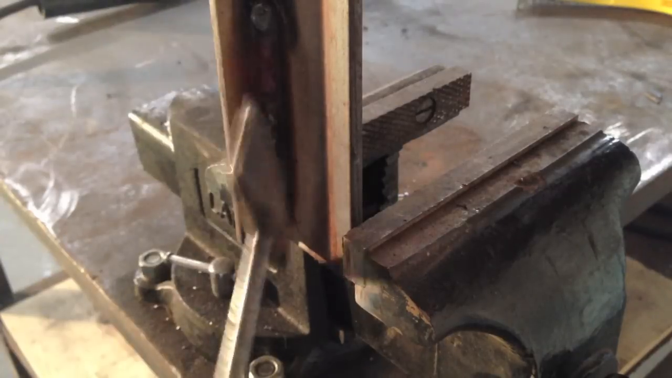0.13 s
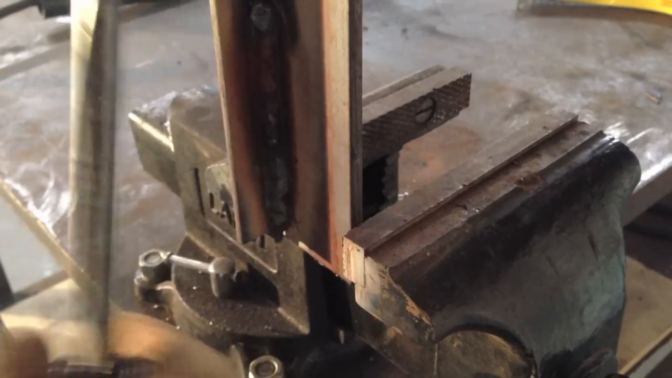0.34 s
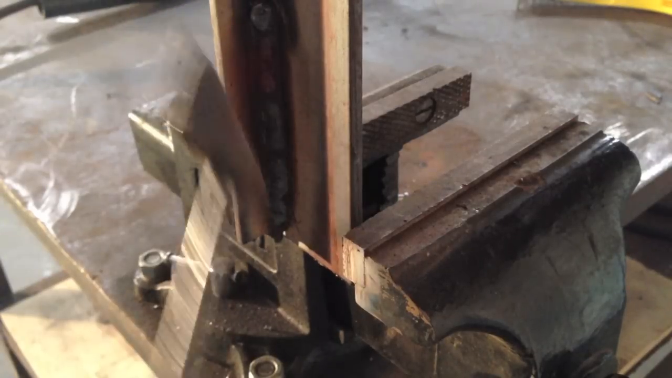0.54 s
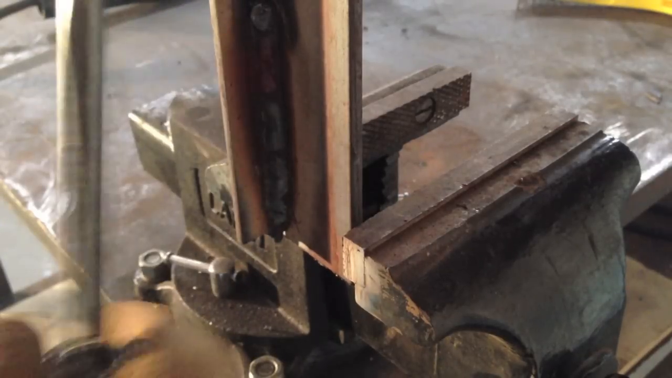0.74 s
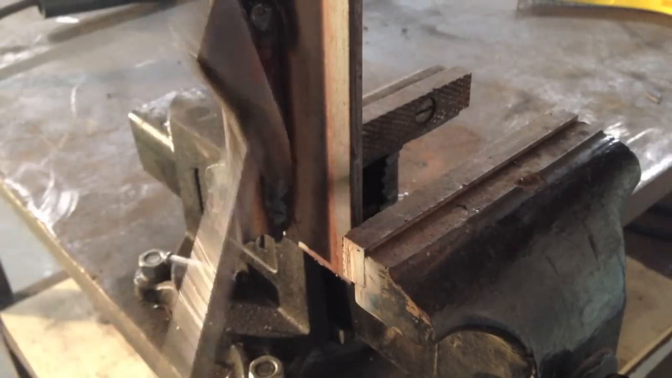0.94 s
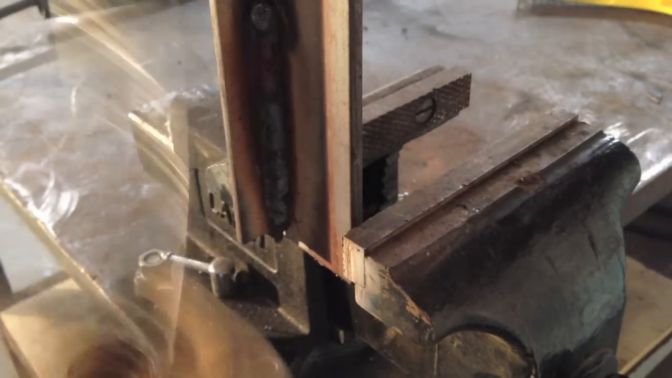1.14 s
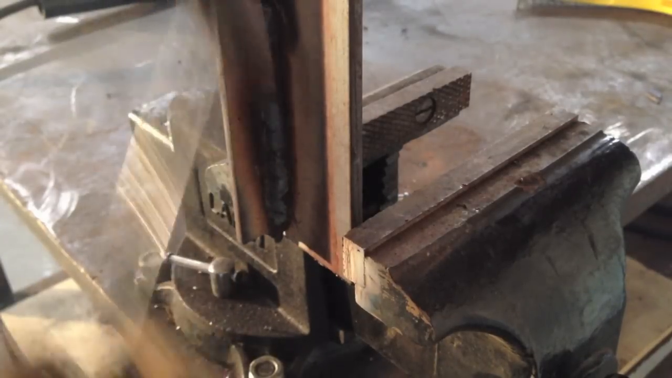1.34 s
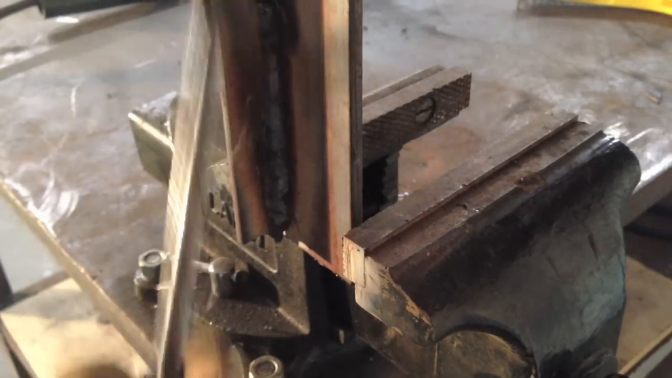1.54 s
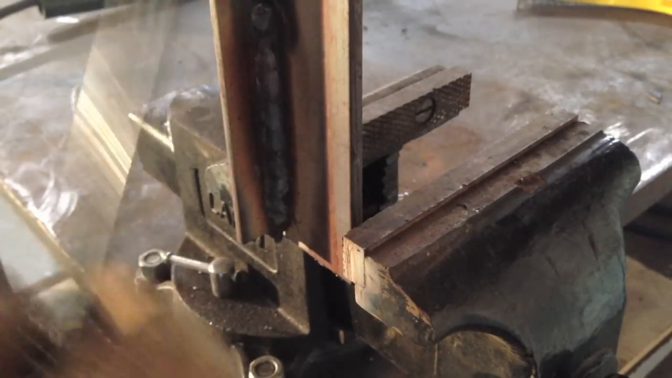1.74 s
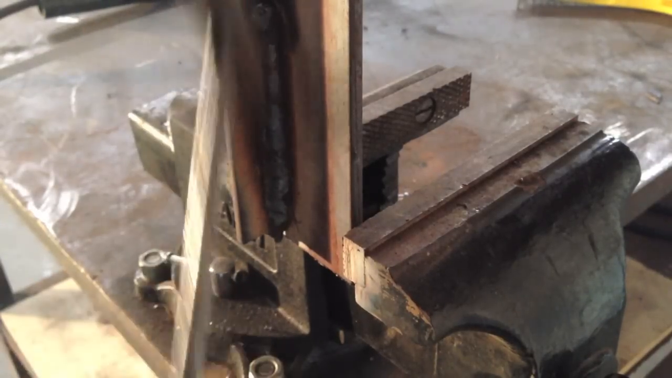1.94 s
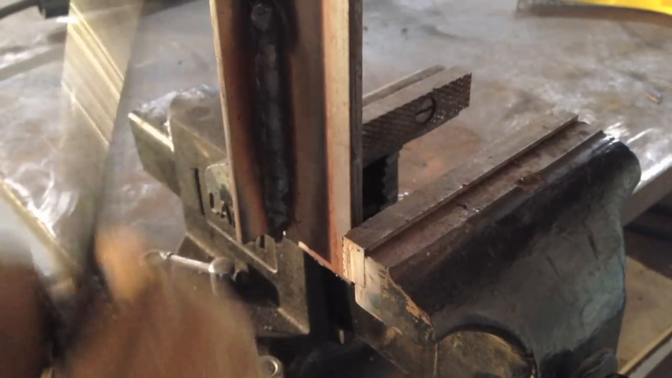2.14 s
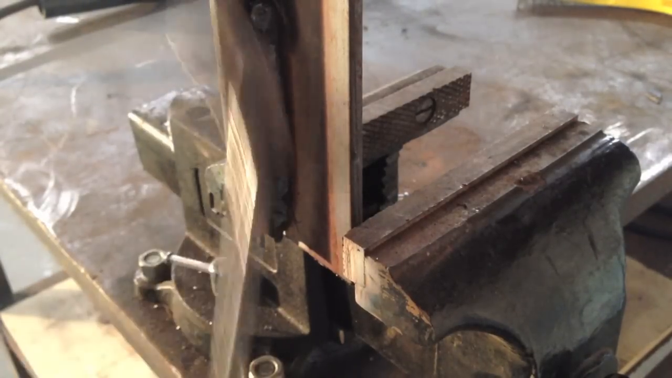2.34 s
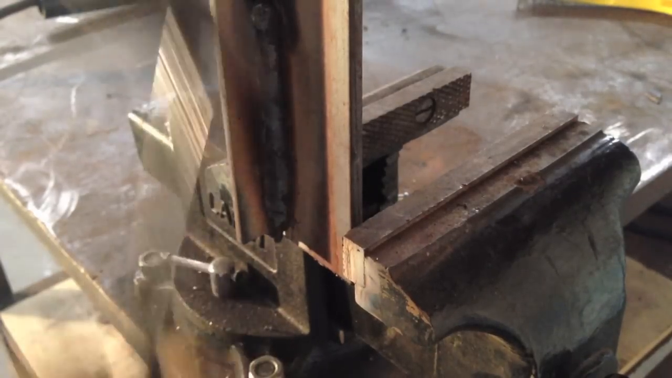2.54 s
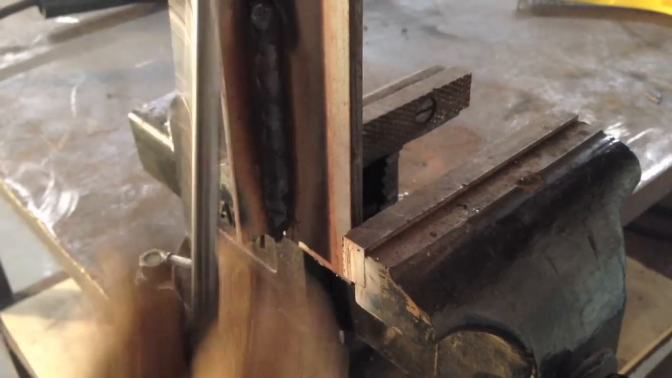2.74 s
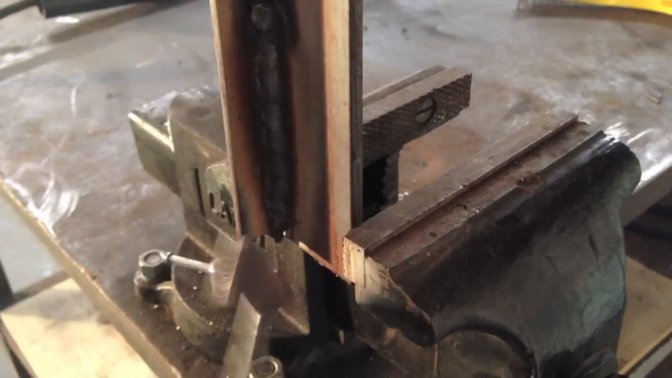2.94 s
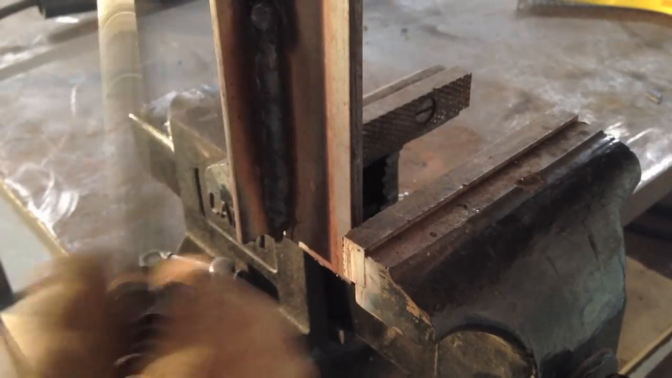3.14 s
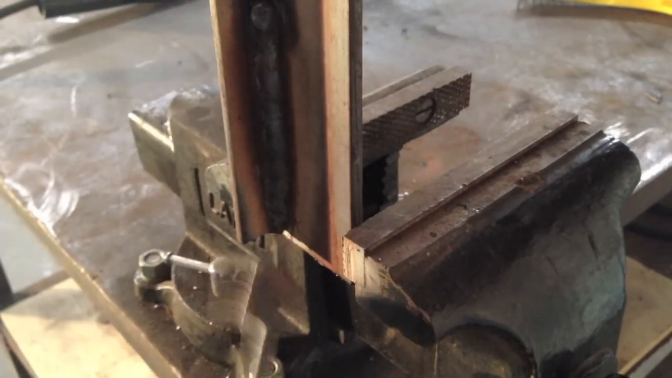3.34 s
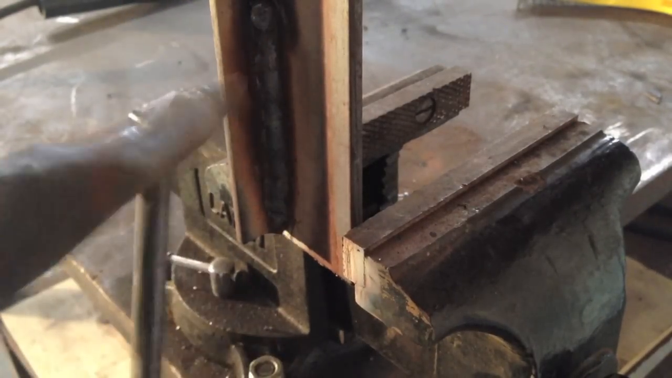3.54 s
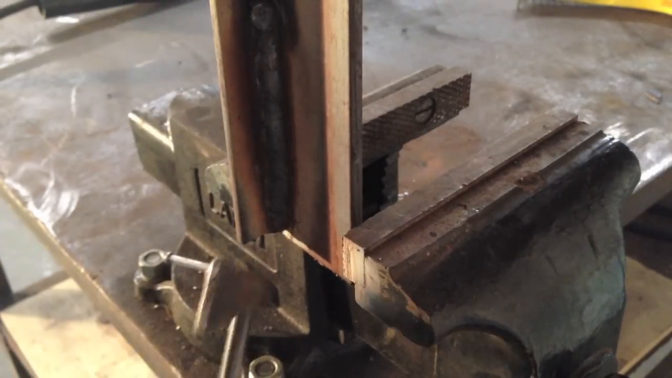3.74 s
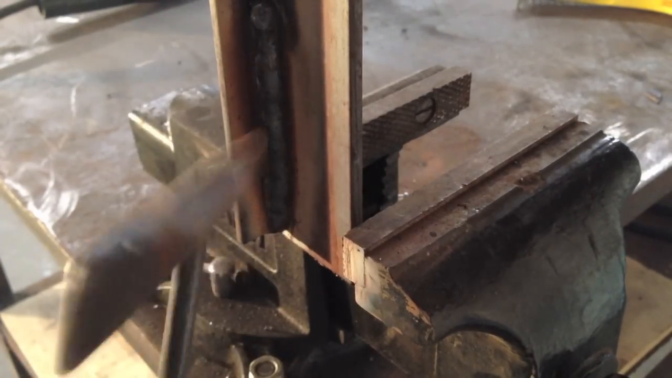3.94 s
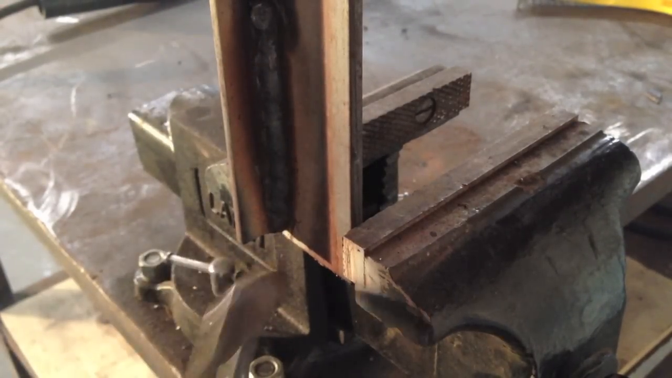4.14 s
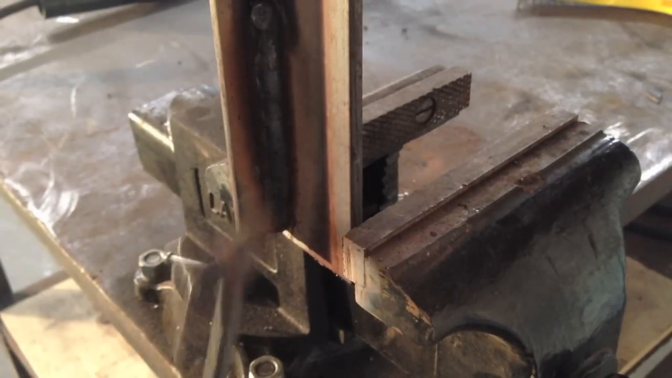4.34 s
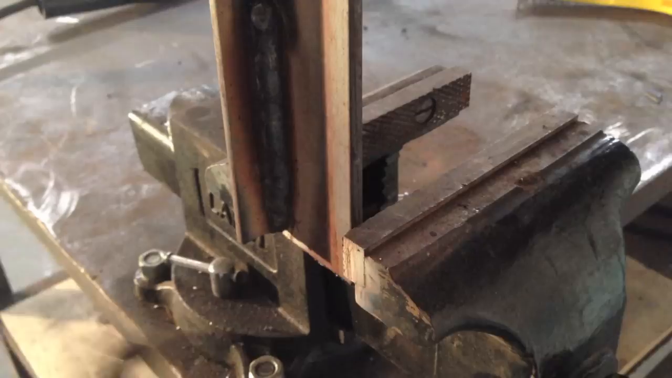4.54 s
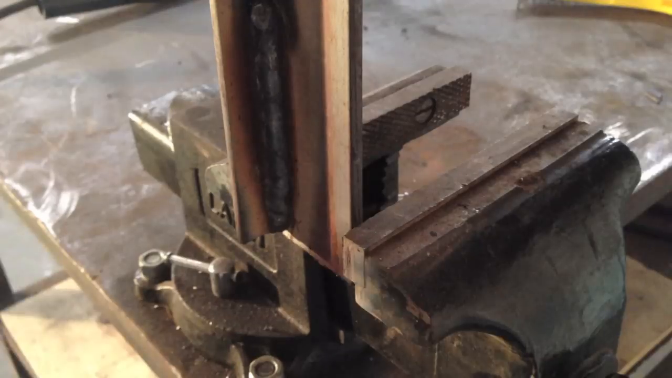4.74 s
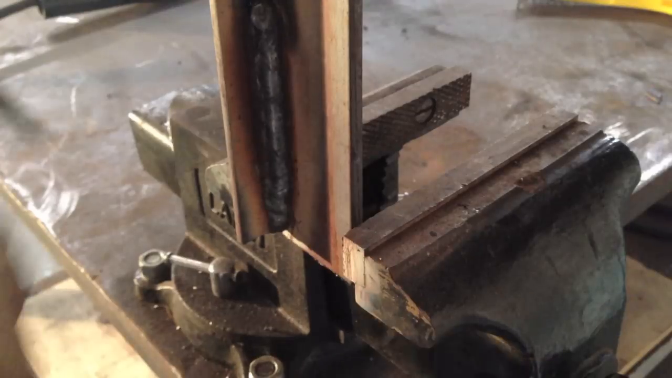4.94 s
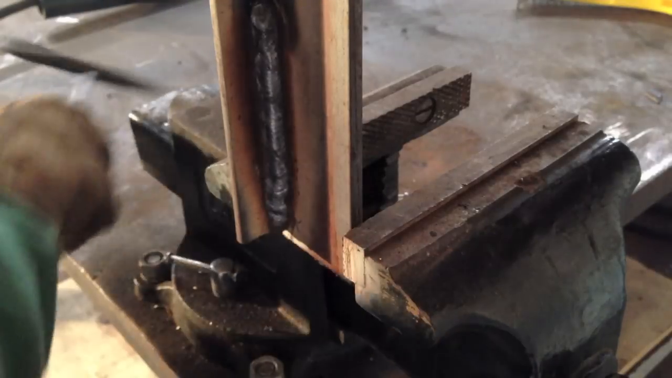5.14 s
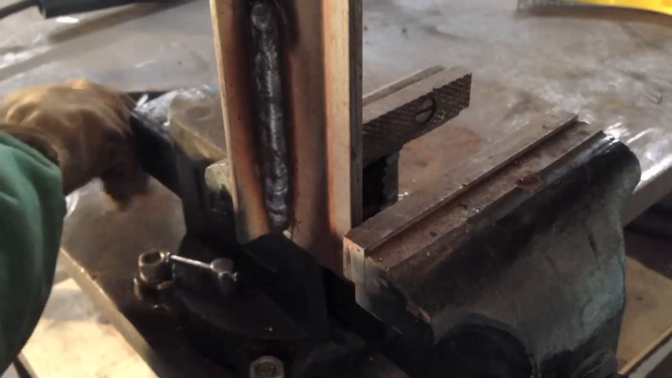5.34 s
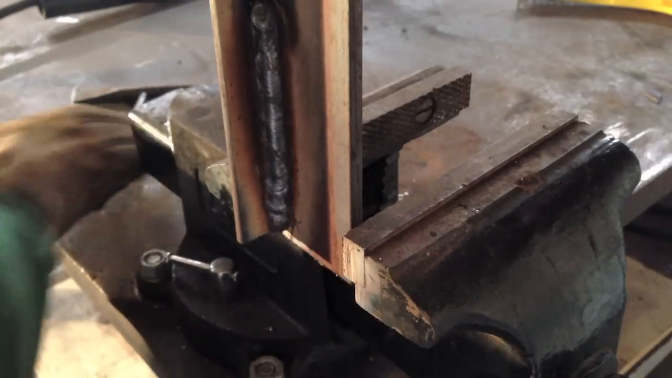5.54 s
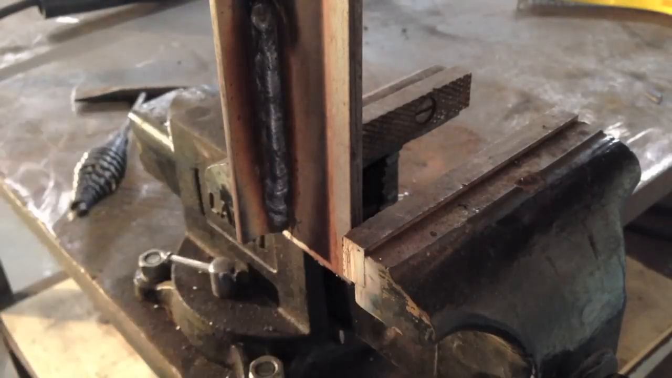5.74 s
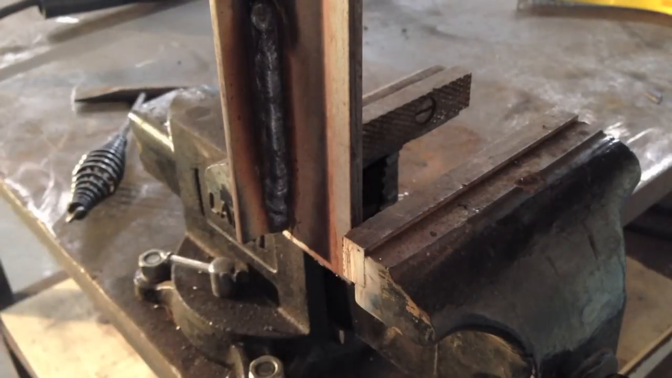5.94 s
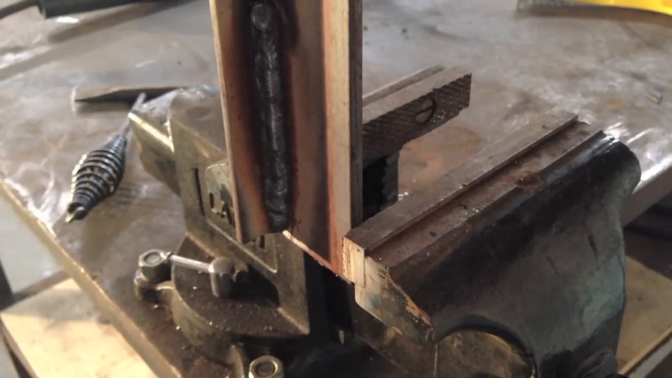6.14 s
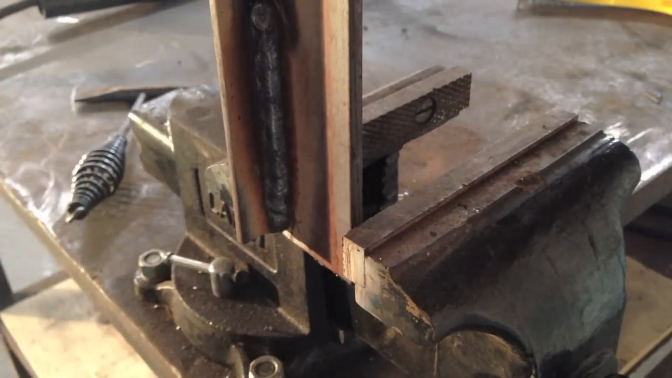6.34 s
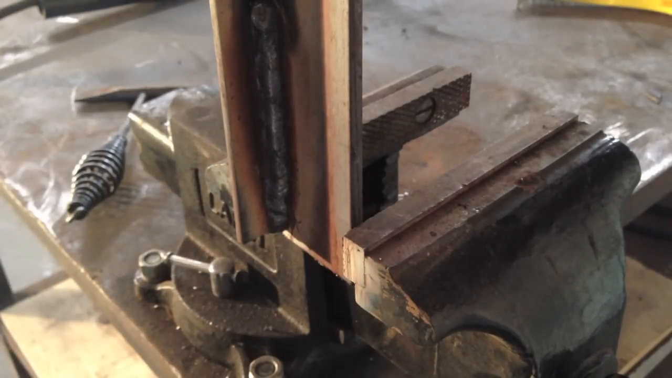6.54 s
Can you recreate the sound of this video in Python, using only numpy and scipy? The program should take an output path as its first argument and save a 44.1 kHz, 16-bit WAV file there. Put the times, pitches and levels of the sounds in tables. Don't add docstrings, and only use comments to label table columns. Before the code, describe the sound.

A close microphone in a workshop picks up a steel hammer chipping weld slag from plates clamped in a vise. From 0.1 seconds, sharp bright cracks fall about every 0.37 seconds, each with brittle sizzle, a midrange plate ring and a small vise rattle; some add a very high, quickly damped hammer ping. Around 2.3 seconds the edge skips and scrapes grittily; further scraping strokes come at 2.8 and 3.25, with tight double and triple clicks. Firm ringing knocks follow at 3.7, 4.1 and 4.4, then the metal dies away. At 5.3 seconds the hammer is dropped on a steel bench: a hard double clack with a hollow boom, then lighter jingling bounces from 5.5 to 5.7, a soft rocking rumble, and a short slide stopping near 6.1. Only quiet ventilation hum and hiss remain until about 6.6 seconds.

```python
import sys
import numpy as np
from scipy import signal
from scipy.io import wavfile
from scipy.ndimage import uniform_filter1d

SR = 44100
rng = np.random.default_rng(int(sys.argv[2]) if len(sys.argv) > 2 else 0)


def volts_from_db(level):
    exponent = np.asarray(level, float) / 20
    return 10 ** exponent


def generate_wav(sig):
    pcm = np.round(np.clip(np.atleast_2d(sig).T, -1, 1) * 32767).astype(np.int16)
    wavfile.write(sys.argv[1], SR, pcm)


N = 291058

# t/s, crack peak level/dB, plate level/dB, head ring
# level/dB, free fin level/dB
BLOWS = [(0.0978, -2, -27.5, -8, -33.5), (0.4847, 2.5, -27, -29, -32.5), (0.854, 4, -21, -7, -45),
         (1.2275, 0, -23.5, -47.5, -52), (1.5921, 0, -20, -17, -19.5), (1.951, -3.5, -26, -47, -25.5),
         (2.3175, -2, -25, -28, -19.5), (2.7666, -11, -23, -55.5, -28.5), (2.8425, -6.5, -19.5, -28, -24.5),
         (3.246, -9, -40, -17, -22), (3.3813, -25, -20.5, -25, -21.5), (3.7124, -1, -22, -35.5, -24),
         (4.0782, 1, -18.5, -43, -22), (4.405, -1, -18.5, -47, -17)]
# t/s, crack peak level/dB, plate level/dB, head ring level/dB
SKIPS = [(0.4787, -3.5, -25.5, -34.5), (0.8586, 4, -30.5, -22.5), (0.9125, -25, -43, -52),
         (1.1052, -33.5, -54, -47), (1.2438, -18, -27, -22.5), (1.9903, -8, -27.5, -64),
         (2.2382, -28, -55, -60), (2.3272, -6, -22, -30), (2.3405, -33, -22, -14.5),
         (2.4394, -18, -25, -28.5), (2.791, -8, -25, -60), (2.817, -1, -18, -60), (3.2553, -30.5, -18, -38),
         (3.269, -4.5, -28, -49), (3.296, -25, -26, -29), (3.3025, -6.5, -36, -11),
         (3.32, -19, -17.5, -12.5), (3.706, -2.5, -29, -19), (3.7588, -13, -25.5, -51),
         (3.7774, -11, -39, -48), (4.1304, -23, -36, -33), (4.4273, -9.5, -31, -20.5)]
# start t/s, length t/s, grit level/dB, push level/dB, push swell level/dB
DRAGS = [
    (2.25, 0.038, -58, -52, 0),
    (2.319, 0.11, -31.5, -23.5, -0.5),
    (2.808, 0.12, -31, -31, 3),
    (3.249, 0.11, -25.5, -26, 5.5),
    (5.576, 0.35, -52, -38, -9),
    (5.887, 0.21, -47.5, -51.5, -1),
]
# t/s, crack peak level/dB, bench level/dB, jingle level/dB
DROPS = [
    (5.326, -1.5, -11.5, -53),
    (5.3388, 0, -17, -30),
    (5.358, -10, -30, -37),
    (5.4902, -16, -25.5, -30),
    (5.5819, -11, -29.5, -30),
    (5.658, -11.5, -32, -29),
    (5.7828, -29, -37, -33.5),
    (5.8399, -9.5, -38.5, -29),
    (5.8788, -16.5, -31.5, -30.5),
    (5.9365, -24, -34.5, -35),
]
# t/s, high ring level/dB, low ring level/dB
LIFTS = [(.075, -51.5, -65.5), (.086, -53, -72), (.106, -28.5, -47), (1.246, -44, -58), (2.842, -25, -33),
         (2.875, -30, -53), (3.29, -45, -30), (3.382, -20.5, -29), (3.759, -31, -39), (4.133, -40.5, -69)]
# f/Hz, t60/s, beat f/Hz
SONG = [(7995, 0.077, 49), (3800, .13, 12)]
# t/s, f/Hz, level/dB
ACCENTS = [(.098, 905, -38.5), (.485, 900, -35), (.487, 2603, -40.5), (.486, 6410, -29.5),
           (.856, 950, -32.5), (.855, 1530, -40.5), (.855, 2010, -49), (.856, 2604, -29), (.856, 6500, -42),
           (1.228, 925, -30), (1.227, 910, -34), (1.24, 285, -34.5), (1.227, 5900, -46),
           (1.592, 940, -31.5), (1.592, 260, -34), (2.326, 1497, -26.5), (2.34, 1896, -38),
           (2.341, 1400, -35), (2.819, 1070, -45), (2.79, 1490, -31), (3.27, 1495, -31),
           (3.253, 990, -31.5), (3.711, 1840, -27.5), (3.712, 1526, -37.5), (4.08, 1873, -25.5),
           (4.078, 2903, -36), (4.077, 1600, -34), (4.405, 1700, -30), (4.425, 380, -34.5)]
# f/Hz, level/dB against the plates
EVERY_BLOW = [(1515, -13), (1893, -12), (2196, -18), (2603, -24)]
# f/Hz, t60/s
ACCENT_DECAY = [(300, .35), (930, 0.42), (1500, .55), (1850, 0.35), (2600, 0.28), (6000, .15)]
# f/Hz, level/dB, t60/s
HEAD_MODES = [(3730, -25, .2), (6400, -32.5, .05), (7370, -15, 0.11), (7990, -4.5, 0.21), (8514, -1, 0.04)]
# f/Hz, level/dB, t60/s
PLATE_MODES = [(290, -6, .2), (395, -5, .15), (620, -11, .15), (765, -16, .15), (921, 0, .2),
               (953, -4, .18), (980, -3, .18), (1035, -4, .18), (1165, -8, .18), (1455, -7, .15),
               (1495, -1, .17), (1545, -4, .17), (1668, -7, .17), (1872, -3, .15), (1930, -7, .15),
               (2025, -6, .15), (2100, -9, .15), (2200, -8, .15), (2600, -9, .15)]
# f/Hz, level/dB, t60/s
BENCH_MODES = [(217, -2, 0.092), (279, -1.5, 0.23), (418, -2, 0.22), (512, -15, 0.16), (661, -1, 0.13),
               (1012, -6.5, .18), (1076, -3, 0.14), (1300, 1, 0.085), (1454, -4, 0.13), (1894, -8.5, 0.079)]
# f/Hz, level/dB, t60/s
LOOSE_MODES = [(1405, -2, .15), (1660, -1, .2), (1900, -3, .15), (2400, -6, .15), (2730, -6, .15),
               (3180, -8, .1), (3520, -2, .09), (3850, -7, .1), (4090, -7, .1), (4495, -8, .07),
               (4870, -8, .1), (5370, -10, .07), (5860, -8, .1), (6300, -8, .1), (6770, -5, .1),
               (7560, -6, .1), (7750, -5, .1), (7960, -4, .12), (8440, -6, .08), (8700, -9, .08)]
# f/Hz, level/dB per Hz
CRACK = [(880, -32.5), (1500, -18.5), (3580, -5), (4230, -12.5), (6310, -5.5), (7380, -10.5), (8210, 18.5),
         (12300, -46), (15500, -44.5)]
# f/Hz, level/dB per Hz
SIZZLE = [(1180, -34.5), (2000, -0.5), (2170, -24.5), (2620, -19.5), (4820, -9), (8050, -4.5), (9320, -2),
          (11200, -51.5), (14000, -46)]
# f/Hz, level/dB per Hz
RATTLE = [(47, -62.5), (80, -23.5), (160, -14.5), (298, -3.5), (772, -12), (1210, -3), (1320, -8.5),
          (1860, -9.5), (2300, -13.5), (5000, -23), (6500, -48), (11000, -120)]
# f/Hz, level/dB per Hz
BOOM = [(35, -62), (60, 11.5), (199, -20.5), (295, -12), (418, 3), (786, -10), (896, -5), (1330, 1),
        (2440, -9), (7930, -12.5), (11000, 0), (14300, -61), (22000, -120)]
# f/Hz, t60/s
DYING = [(100, 0.27), (300, 0.65), (1000, 0.57), (2500, 0.59), (5000, 0.3), (8000, 0.31), (14000, .2)]
# f/Hz, level/dB per Hz
SHOP = [(15, -76), (25, -55), (92, -21.5), (108, -17.5), (195, -1), (309, -16.5), (344, -4), (427, -6),
        (863, -31), (988, 0), (1160, -22), (1520, -20), (2350, -36), (14800, -45), (16000, -62)]
# t/s, level/dB
SHOP_LEVEL = [(0, -41), (.09, -50), (.8, -50), (2, -47), (6.6, -46)]

FIN_HZ, FIN_T60_S = 1227, .66
BEAT_SHARE = .008
FREE_S, SKIP_FIN_DB = 0.0068, -16
BITE_DB_PER_S, LET_GO_DB_PER_S, GRIT_THINS_DB_PER_S = 2500, 500, 2.5
BENCH_S, SLIDE_S = 5, 5.86


def contacts():
    skips = [(s, crack_db, plate_db, ring_db, plate_db + SKIP_FIN_DB) for s, crack_db, plate_db, ring_db in SKIPS]
    return np.insert(np.transpose(BLOWS + skips), obj=4, values=FREE_S, axis=0)


def cracks(times, crack_db):
    power = clicks(times, volts_from_db(2 * crack_db))
    between_bounces = (np.arange(N) > BENCH_S * SR) & (np.arange(N) < SLIDE_S * SR)
    grains = (drag("grit") * ~between_bounces * grit(per_s=490.0, spread_db=9.5)) ** 2
    snap = volts_from_db(-12.5) * np.sqrt(fading(power, 0.039) + volts_from_db(-19.5) * fading(grains, 0.048))
    bright = sum(noise for hz, noise in bands(CRACK))
    sizzle = tail(power + volts_from_db(-48) * grains, SIZZLE, longer=0.84, rise_cycles=6.9)
    return snap * bright + volts_from_db(-32) * sizzle


def ticks(times, crack_db):
    white = rng.standard_normal(N)
    power = clicks(times, volts_from_db(2 * crack_db))
    burst = np.sqrt(fading(power, 0.015)) * white
    fizz = burst + volts_from_db(-11) * drag("grit") * white
    splash = np.sqrt(fading(power, 0.14)) * white
    top = bandpass(2, 9000, 11500, burst) + volts_from_db(-13.5) * bandpass(3, 9300, 10900, splash)
    air = bandpass(3, 13000, 15500, fizz)
    return volts_from_db(-27.5) * top + volts_from_db(-37.0) * air


def head(times, ring_db, free_s):
    t, out = np.arange(SR // 2) / SR, np.zeros(N + SR)
    share_db = 1.0 * rng.standard_normal((len(times), len(HEAD_MODES)))
    for s, db, free, shares in zip(times, ring_db, free_s, share_db):
        damped = volts_from_db(-20.5) + (1 - volts_from_db(-17.0)) * np.exp(-np.clip(t - free, 0, None) / 0.0011)
        tone = sum(volts_from_db(mode_db + share - 60 * t / t60) * np.sin(2 * np.pi * hz * t)
                   for (hz, mode_db, t60), share in zip(HEAD_MODES, shares))
        start = int(s * SR)
        out[start:start + len(t)] += volts_from_db(db + 3.0) * damped * tone
    return out[:N]


def drag(kind):
    t, out_db = np.arange(N) / SR, -150
    for s, length, grit_db, push_db, swell_db in DRAGS:
        held = np.clip(t - s, 0, length)
        if kind == "grit":
            db = grit_db - GRIT_THINS_DB_PER_S * held
        else:
            db = push_db + swell_db * held / length
        db = db - BITE_DB_PER_S * np.clip(s - t, 0, 1)
        db = db - LET_GO_DB_PER_S * np.clip(t - s - length, 0, 1)
        out_db = np.maximum(out_db, db)
    return volts_from_db(out_db)


def grit(per_s, spread_db):
    sizes = volts_from_db(spread_db * np.minimum(rng.exponential(1, N), 3)) * rng.choice([-1, 1], N)
    return rms_one(sizes * (rng.random(N) < per_s / SR))


def plates():
    s, _, plate_db, _, _, fin_db = contacts()
    push = drag("push") * (np.arange(N) < BENCH_S * SR)
    rub = volts_from_db(-36.5) * push * grit(per_s=820.0, spread_db=1.5)
    modes = struck(PLATE_MODES, s, plate_db - 17.5, rub, spread_db=3.0, chatter_db=-26.0, chatter_t60=0.43)
    power = clicks(s, volts_from_db(2 * fin_db))
    swell = np.sqrt(fading(power, FIN_T60_S)) - np.sqrt(fading(power, 0.28))
    fin = swell * np.sin(2 * np.pi * FIN_HZ * np.arange(N) / SR)
    shaken = clicks(s, volts_from_db(2 * plate_db)) + volts_from_db(-77) * push ** 2
    rattle = tail(shaken, RATTLE, longer=0.82, rise_cycles=2.0)
    return modes + accents(), fin + volts_from_db(-6.5) * rattle


def accents():
    t, out = np.arange(SR // 2) / SR, np.zeros(N + SR)
    usual = [(row[0], hz, row[2] + db + 2.5 * rng.standard_normal()) for row in BLOWS for hz, db in EVERY_BLOW]
    rows = [(s, hz, db, at_hz(ACCENT_DECAY, hz), BEAT_SHARE * hz) for s, hz, db in ACCENTS + usual]
    rows += [(s, hz, db, t60, beat_hz) for s, *levels in LIFTS for db, (hz, t60, beat_hz) in zip(levels, SONG)]
    for s, hz, db, t60, beat_hz in rows:
        cluster = sum(height * np.sin(2 * np.pi * (hz + k * beat_hz) * t)
                      for height, k in [(0.91, 0), (0.81, 0.92), (-0.47, -1.4)])
        start = int(s * SR)
        out[start:start + len(t)] += volts_from_db(db - 60 * t / t60) * cluster
    return out[:N]


def bench():
    s, _, bench_db, jingle_db = np.transpose(DROPS)
    push = drag("push") * (np.arange(N) > BENCH_S * SR)
    grains = grit(per_s=400.0, spread_db=0.5)
    rub = volts_from_db(-34.0) * push * grains
    modes = struck(BENCH_MODES, s, bench_db - 16.5, rub, spread_db=4.5, chatter_db=-23.5, chatter_t60=0.46)
    slide = volts_from_db(-35) * drag("grit") * (np.arange(N) > SLIDE_S * SR) * grains
    jingle = struck(LOOSE_MODES, s, jingle_db - 12, slide, spread_db=3.5, chatter_db=-21.5, chatter_t60=0.074)
    shaken = clicks(s, volts_from_db(2 * bench_db)) + volts_from_db(-64) * push ** 2
    boom = tail(shaken, BOOM, longer=1.0, rise_cycles=2.9)
    rumble = ring(push * rng.standard_normal(N), 370, 0.029)
    return modes + jingle, volts_from_db(-4) * boom + volts_from_db(-11.5) * rumble


def shop():
    level_db = np.interp(np.arange(N) / SR, *np.transpose(SHOP_LEVEL))
    return volts_from_db(level_db) * sum(noise for hz, noise in bands(SHOP))


def struck(modes, times, db, rub, spread_db, chatter_db, chatter_t60):
    share_db = spread_db * rng.standard_normal((len(times), len(modes)))
    chatter = np.sqrt(fading(clicks(times, volts_from_db(2 * (db + chatter_db))), chatter_t60))
    feed = rub + chatter * rng.standard_normal(N)
    return sum(volts_from_db(mode_db) * ring(clicks(times, volts_from_db(db + share_db[:, k])) + feed, hz, t60)
               for k, (hz, mode_db, t60) in enumerate(modes))


def ring(force, hz, t60):
    r, w = volts_from_db(-60 / (t60 * SR)), 2 * np.pi * hz / SR
    return signal.lfilter([0, np.sin(w)], [1, -2 * r * np.cos(w), r * r], force)


def tail(power, spectrum, longer, rise_cycles):
    out = np.zeros(N)
    for hz, noise in bands(spectrum):
        r = np.exp(-hz / (rise_cycles * SR))
        dying = fading(power, longer * at_hz(DYING, hz))
        out += noise * np.sqrt(signal.lfilter([1 - r], [1, -r], dying))
    return out


def bands(spectrum):
    edges = 25 * 2 ** (np.arange(29) / 3)
    centres = np.sqrt(edges[1:] * edges[:-1])
    white = rng.standard_normal((2, N))
    heard = [k for k, hz in enumerate(centres) if spectrum[0][0] < hz < spectrum[-1][0]]
    noise = [volts_from_db(at_hz(spectrum, centres[k])) * bandpass(2, edges[k], edges[k + 1], white[k % 2]) for k in heard]
    return zip(centres[heard], noise / np.std(sum(noise)))


def bandpass(order, low_hz, high_hz, x):
    return signal.sosfilt(signal.butter(order, [low_hz, high_hz], "band", fs=SR, output="sos"), x)


def clicks(times, heights):
    train = np.full(N, 1e-18)
    np.add.at(train, (np.asarray(times) * SR).astype(int), heights)
    return train


def fading(power, t60):
    return signal.lfilter([1], [1, -volts_from_db(-120 / (t60 * SR))], power)


def at_hz(points, hz):
    table_hz, values = np.array(points)[:, 0], np.array(points)[:, 1]
    return np.interp(np.log(hz), np.log(table_hz), values)


def rms_one(x):
    return x / np.sqrt(np.mean(x ** 2) + 1e-20)


def workshop(x, t60, wet_db):
    t = np.arange(SR // 2) / SR
    echoes = rng.standard_normal(len(t)) * volts_from_db(-60 * t / t60) * (t > .004)
    return x + volts_from_db(wet_db) * signal.fftconvolve(x, echoes / np.linalg.norm(echoes))[:N]


def microphone(near):
    near = signal.sosfilt(signal.butter(3, 190, "high", fs=SR, output="sos"), near)
    return signal.sosfilt(signal.cheby2(8, 55, 10400, fs=SR, output="sos"), near)


def scene():
    blows, drops = contacts(), np.transpose(DROPS)
    s, crack_db = np.hstack([blows[:2], drops[:2]])
    (plate_rings, rattle), (bench_rings, boom) = plates(), bench()
    rings = workshop(plate_rings + bench_rings, t60=0.31, wet_db=-5.5)
    hammer = workshop(head(blows[0], blows[3], blows[4]), t60=0.25, wet_db=-13.5)
    near = cracks(s, crack_db) + hammer + rings + rattle + boom
    whistle = ring(clicks(blows[0], volts_from_db(blows[3] - 44.5)), 13200, 0.12)
    return (microphone(near) + whistle + ticks(s, crack_db) + shop())[None]


def smear_ahead(x):
    power = uniform_filter1d(bandpass(3, 900, 3400, x) ** 2, size=200)
    ahead = fading(power[::-1], 0.035)[::-1] * volts_from_db(-69.5)
    noise = rms_one(bandpass(3, 900, 3400, rng.standard_normal(N)))
    return np.sqrt(np.clip(ahead - power, 0, None)) * noise


def masked_top(x, from_hz, under_db, fall_db):
    hz, _, spec = signal.stft(x, SR, nperseg=512)
    power = np.abs(spec) ** 2
    loud = uniform_filter1d(power.sum(axis=0), size=5)
    limit = volts_from_db(2 * (under_db - fall_db * (hz - from_hz) / 1000))[:, None] * loud
    smooth = uniform_filter1d(uniform_filter1d(power, size=9, axis=0), size=3, axis=1)
    masked = (smooth < limit) & (hz > from_hz)[:, None]
    spec[masked | (hz > 15900)[:, None]] = 0
    return signal.istft(spec, SR, nperseg=512)[1][:N]


def band_limit(x):
    return signal.sosfilt(signal.butter(12, 16490, fs=SR, output="sos"), x)


def record(dry):
    smeared = dry[0] + smear_ahead(dry[0])
    mix = masked_top(smeared, from_hz=8900, under_db=-56, fall_db=1.7)[None]
    return band_limit(mix)


dry = scene()
out = record(dry)
generate_wav(out)
```